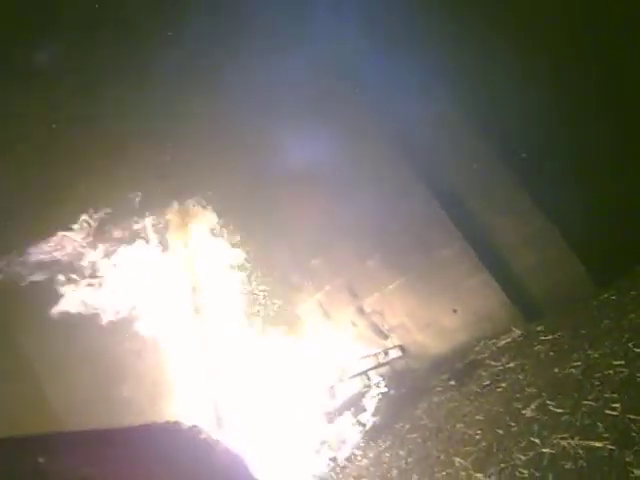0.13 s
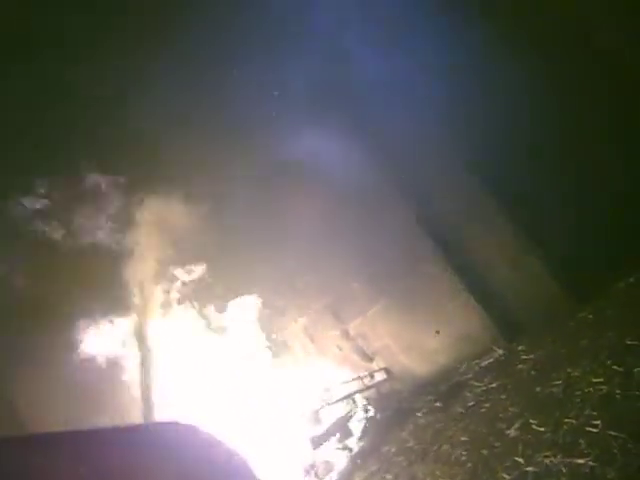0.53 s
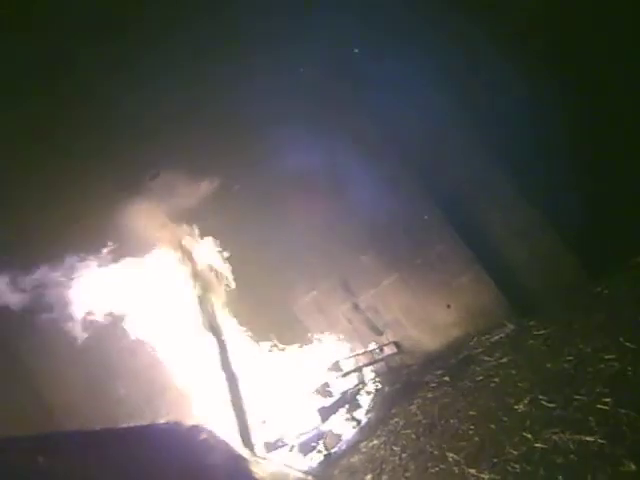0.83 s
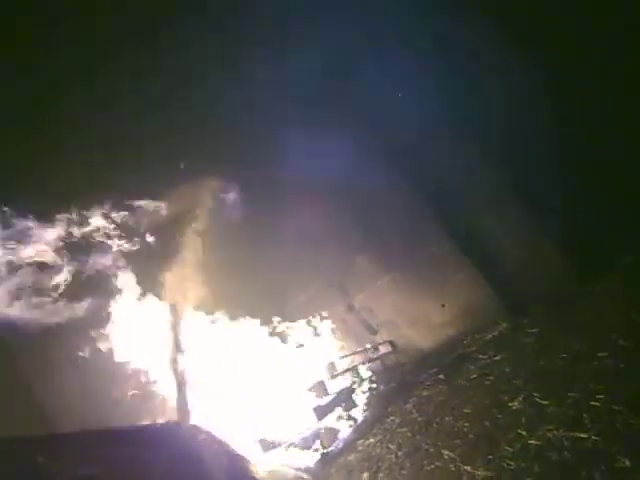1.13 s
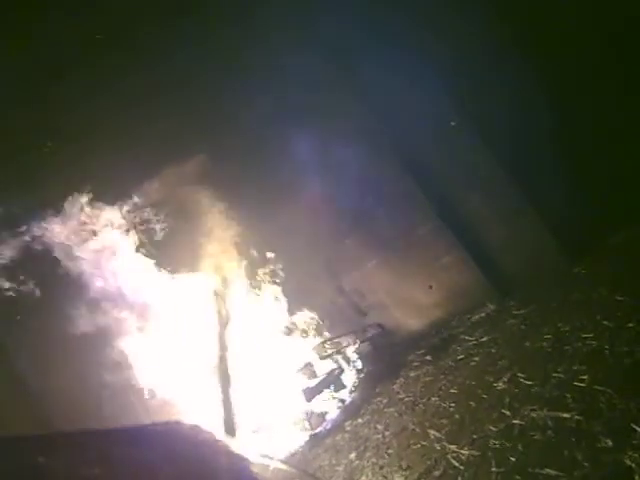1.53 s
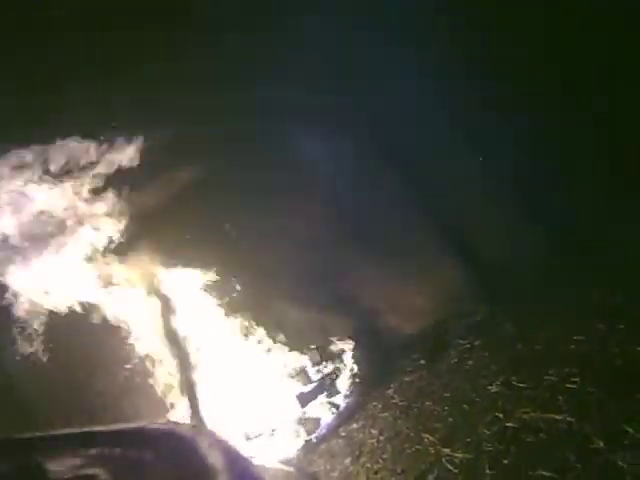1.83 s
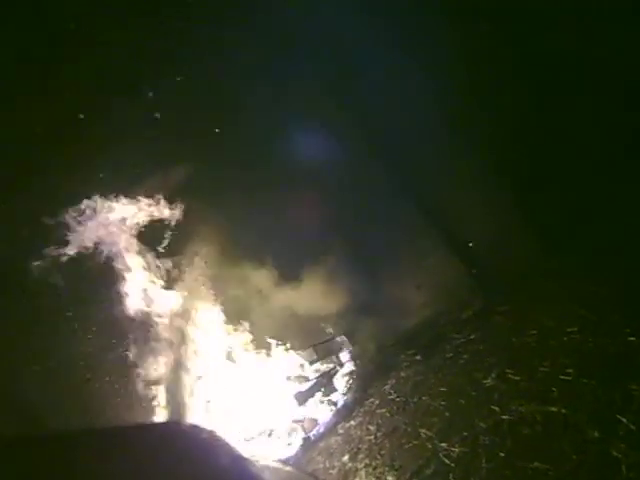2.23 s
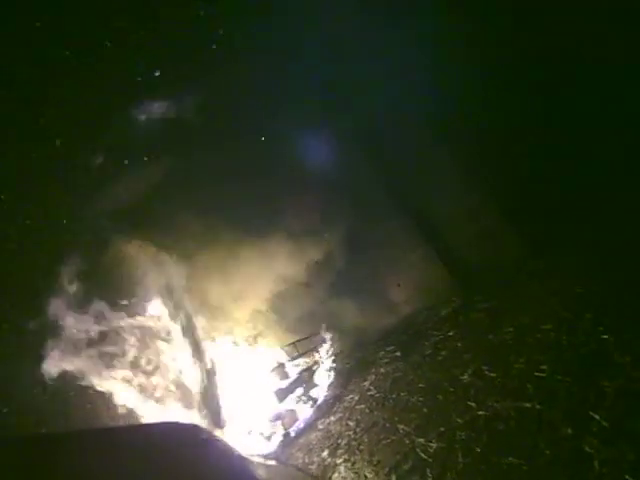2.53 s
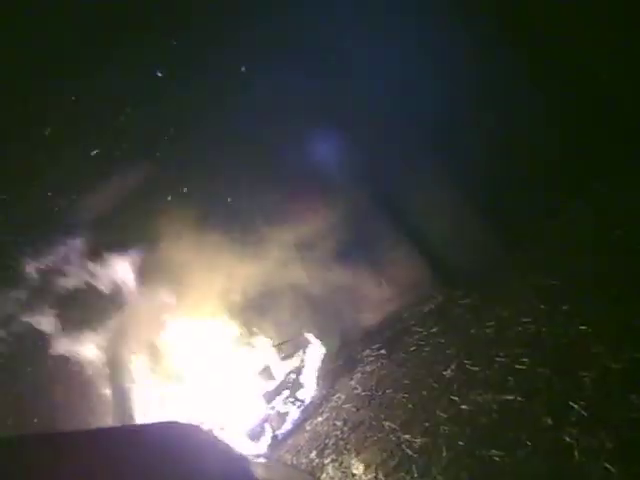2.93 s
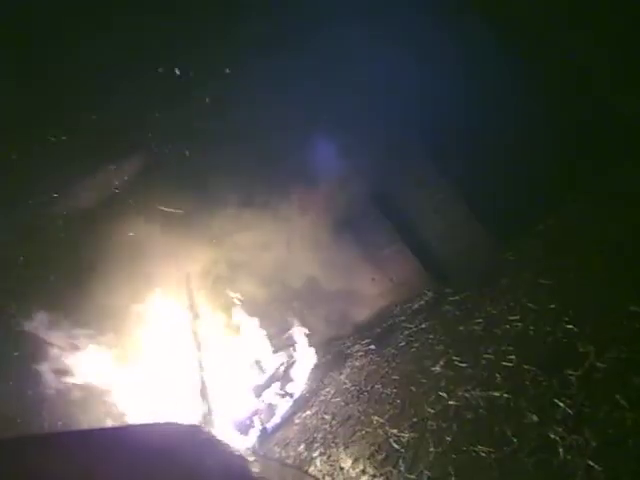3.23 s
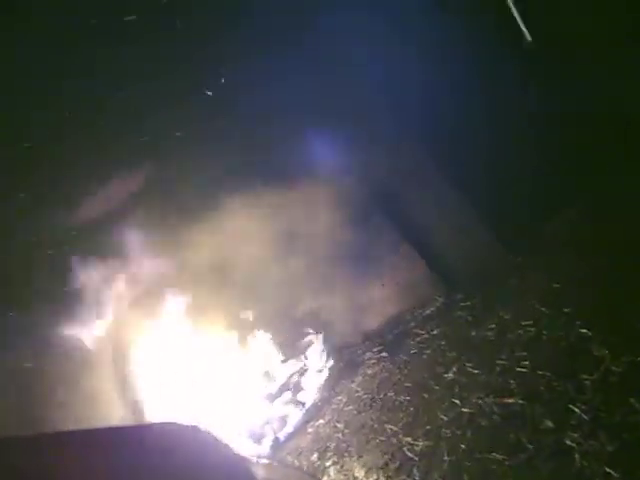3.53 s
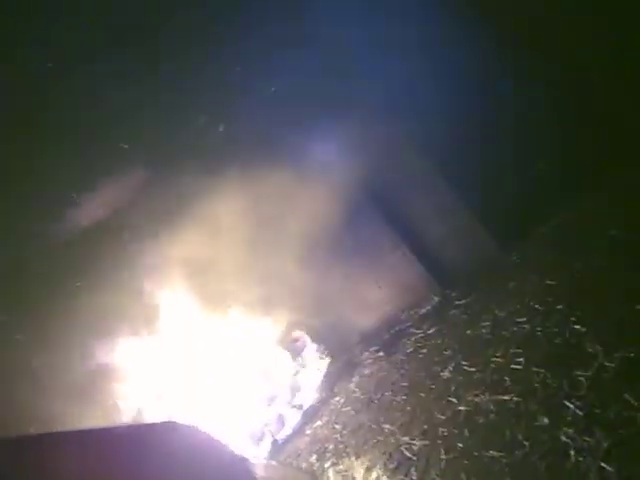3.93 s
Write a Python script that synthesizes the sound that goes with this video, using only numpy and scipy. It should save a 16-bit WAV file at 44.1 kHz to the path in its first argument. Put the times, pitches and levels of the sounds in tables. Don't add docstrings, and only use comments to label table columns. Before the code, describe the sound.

In a bare concrete room, a water jet gives a quick spit, thins for about a third of a second, then opens into full harsh spray. It surges over burning pallets, slapping, drumming and fizzing to steam, with board knocks and sharp straw cracks over a low fire roar. A close camera in a closed housing makes it boxy and resonant, with a dull rapid electrical tick underneath.

```python
import sys
import numpy as np
from scipy import signal
from scipy.fft import rfft, irfft
from scipy.io import wavfile
from scipy.ndimage import uniform_filter1d

SR = 44100
rng = np.random.default_rng(int(sys.argv[2]) if len(sys.argv) > 2 else 0)


def rack_gain(trim_db):
    fader = np.asarray(trim_db, float)
    return 10 ** (fader / 20)


def unload_wav(signal):
    wavfile.write(
        sys.argv[1],
        SR,
        np.round(np.clip(np.atleast_2d(signal).T, -1, 1) * 32767).astype(np.int16),
    )


N = 179531

# (frequency [Hz], level [dB])
WALL_WASH = [(120, -29), (200, -40), (269, -8.5), (382, -6.5), (417, -6), (477, -10.5), (603, -5),
             (886, -8), (1000, -0.5), (1300, -43), (2200, -120)]
# (peak time [s], swell [dB], half length [s])
STEAM_FLASHES = [(0.62, 3.5, 0.14), (0.815, 13, 0.1), (1.19, 8, 0.035), (1.375, 5, 0.065), (1.54, 8, 0.19),
                 (1.834, 6.5, 0.093), (2.073, 6, 0.11), (2.288, 10, 0.11), (2.512, 10.5, 0.09),
                 (2.75, 7, .1), (3.118, 14, 0.064), (3.663, 9, 0.12), (4.07, 10, 0.081)]
# (frequency [Hz], width [Hz], level [dB])
HOUSING_MODES = [(1026, 81, -13), (1235, 148, -8.5), (1340, 59, -17.5), (1724, 163, -3.5), (1899, 83, 0.5),
                 (1998, 154, -3), (2670, 130, -10.5), (2843, 154, -13), (3170, 130, -11), (3348, 168, -4),
                 (3856, 330, -9.5), (4082, 324, -6), (4826, 355, -10.5), (5510, 770, -14.5),
                 (6730, 980, -15.5), (8580, 690, -12.5), (10400, 1820, -10), (12000, 990, -13),
                 (14100, 650, -60)]
TOP_MODE = (14950, 800, -21)
# (time [s], peak level [dB], centre frequency [Hz])
STRAW_CRACKS = [
    (.26, -27, 5000),
    (0.339, -19, 12000),
    (.712, -11, 13500),
    (.872, -12, 8000),
    (1.106, -9, 7100),
    (1.378, -18, 11500),
    (1.965, -13, 6000),
    (3.415, -15, 7500),
    (3.694, -3.5, 6440),
    (3.961, -11, 9000),
]
# (time [s], peak level [dB], pitch [Hz], 60 dB decay time [s])
BOARD_KNOCKS = [(0.557, -9.5, 355, 0.041), (0.78, -18, 350, 0.068), (0.893, -17, 334, 0.036),
                (1.558, -22, 219, 0.091), (1.612, -29, 215, 0.08), (1.774, -27, 234, 0.19),
                (2.187, -17.5, 291, 0.05), (3.075, -12.5, 185, 0.1), (3.08, -16, 1250, 0.15),
                (3.2, -15, 1216, 0.1), (3.612, -14, 1235, 0.13), (3.175, -21, 176.1, 0.091),
                (3.608, -23, 202, 0.072), (.56, -19.5, 159, 0.084), (.895, -16.5, 576, 0.049),
                (0.429, -51, 78.1, 0.1), (0.739, -25, 51.1, 0.1123), (0.919, -23, 53.8, 0.081),
                (1.734, -18, 88.8, 0.04), (2.489, -29, 48.4, 0.11), (3.074, -18, 70.0, 0.1),
                (3.509, -19.5, 44.6, 0.1242), (3.619, -24, 54.3, 0.1277)]
# (time [s], flow [dB], fineness of the spray [dB])
NOZZLE_FLOW = [(0.0, -1.5, -3.5), (0.061, -11.5, 3), (0.082, -6.5, 5.5), (0.13, -13.5, 0), (0.19, -18, 0),
               (0.277, -15, 0), (0.364, -13.5, 4), (0.368, -5.5, -0.5), (0.5, -3, -2), (0.58, 2, -0.5),
               (1.05, 2, -1.5), (1.3, 1.5, -2), (1.87, 0, 1), (2.25, 0.5, -0.5), (2.8, -1, 2.5),
               (3.38, -2.5, 0.5), (3.5, 0.5, 1.5), (4.07, -2, 1.5)]
# (start [s], rise [s], fall length [s], strength [dB], hollowness [dB])
JET_PASSES = [(0.726, 0.11, 0.098, 3.5, 6.5), (1.097, .004, 0.064, 4, -5), (1.13, 0.041, 0.087, 4.5, -0.5),
              (1.38, 0.065, 0.15, 4, 5.5), (1.685, .004, 0.14, 6, -1.5), (1.918, 0.033, 0.13, 4, 3.5),
              (2.173, 0.052, .06, -4, 8.5), (2.445, 0.054, .18, 6.5, 6), (2.834, 0.046, 0.14, 2.5, -4.5),
              (3.065, 0.011, 0.19, 8.5, 8.5), (3.592, 0.033, 0.27, 9, 4), (4.0, .06, 0.071, -0.5, 6),
              (0.52, 0.044, 0.23, 1, 3)]
# (time [s], rise of splash [dB], rise of fizz [dB], length [s])
EDGE_SPURTS = [(0.0645, 10, 12, 0.013), (0.09, 5, 0, .01), (0.432, 7, -6, 0.0057), (0.521, 4.5, 11.5, .008),
               (0.579, 5.5, 9, 0.007), (0.596, 3, 6, 0.0047), (0.746, 2.5, 3, 0.0053),
               (0.859, 4, 2.5, 0.009), (1.177, 2, -2, 0.017), (1.222, 2, -3, 0.0053), (1.372, -3, 6, 0.015),
               (1.96, 4, 2.5, 0.016), (2.537, 5, 12, 0.02), (3.138, -1, 1, 0.0063), (3.17, 5.5, 1, 0.01),
               (3.207, 2, 2, 0.019), (3.252, 1, 2.5, 0.0088), (3.459, 2, 10.5, 0.022), (3.501, 6, 7, 0.015),
               (3.708, -2, 2, 0.01), (3.731, 1, -3, 0.011), (3.75, 1, -1, 0.0059), (0.262, 0, 3.5, 0.026),
               (.335, 0, 1, .01), (0.658, 2.5, 2, 0.011), (1.394, 1.5, 3.5, 0.043), (1.705, 2.5, -1, 0.016),
               (2.852, 3, 0.5, 0.066)]
# (rest level [dB], share of flow [dB/dB], of fineness [dB/dB], of strength [dB/dB], of hollowness [dB/dB])
BOOM = (-45.5, 0.2, -0.8, 0.34, -0.3)
LOWER_WASH = (-44.5, 0.76, 0.1, 0.68, 0.54)
UPPER_WASH = (-41, 0.84, -0.5, 0.82, 0.83)
FIZZ = (-23.5, 0.78, 1, 0.49, 0.05)
SLAP = (-32, 1.0, -0.36, 0.92, 0.32)
DRUM = (-24, 1.0, -0.5, 1.0, 0.08)
SPLASH = (-22, 1.08, 0.53, 0.65, 0.11)


def evened(x):
    return x / np.sqrt(np.mean(x ** 2) + 1e-20)


def add(mix, start_s, sound):
    part = mix[max(round(start_s * SR), 0):][:len(sound)]
    part += sound[:len(part)]


def band(x, lo_hz, hi_hz, order=2):
    edges_hz = [lo_hz, min(hi_hz, 0.49 * SR)]
    return signal.sosfilt(signal.butter(order, edges_hz, "bandpass", fs=SR, output="sos"), x)


def churn(patchy_db, flicker_db, size=256):
    frames, bins = 4 * N // size + 5, size // 2 + 1
    real, imaginary, patches = rng.standard_normal((frames, bins, 3)).T
    patches = uniform_filter1d(patches, size=5, axis=0)
    patches = evened(uniform_filter1d(patches, size=30, axis=1))
    flicker = evened(uniform_filter1d(rng.standard_normal(frames), size=12))
    spectrum = (real + 1j * imaginary) * rack_gain(patchy_db * patches + flicker_db * flicker)
    noise = signal.istft(spectrum, nperseg=size, noverlap=3 * size // 4)[1]
    return evened(noise[:N])


def drops(per_s, spread_db, fade_s):
    size_db = spread_db * np.minimum(rng.exponential(1, N), 5)
    hits = rack_gain(size_db) * (rng.random(N) < per_s / SR)
    puffs = signal.lfilter([1], [1, -np.exp(-1 / (fade_s * SR))], hits)
    return evened(puffs * rng.standard_normal(N))


def housing(x):
    hz = abs(np.fft.fftfreq(4096, 1 / SR))
    power = rack_gain(2 * -23.5) / (1 + (hz / 7000) ** 4)
    for mode_hz, width_hz, db in HOUSING_MODES + [TOP_MODE]:
        offset = 2 * (hz - mode_hz) / (1.54 * width_hz)
        power = power + rack_gain(2 * db) / (1 + offset ** 2) ** 2
    log_gain = 0.5 * np.log(power)
    taps = np.fft.ifft(np.exp(np.conj(signal.hilbert(log_gain)))).real[:2048]
    return signal.oaconvolve(x, taps)[:N]


def follow(layer, lag_s=0.0):
    t = np.arange(N) / SR
    flow_s, flow_db, fineness_db = np.array(NOZZLE_FLOW).T
    strength, hollowness = np.zeros(N), np.zeros(N)
    for start_s, rise_s, length_s, strength_db, hollow_db in JET_PASSES:
        top_s = rise_s + lag_s
        rise = np.clip((t - start_s) / top_s, 0, 1)
        fall = np.exp(-(np.maximum(t - start_s - top_s, 0) / length_s) ** 2)
        strength += strength_db * rise * fall
        hollowness += hollow_db * rise * fall
    flow, fineness = np.interp(t, flow_s, flow_db), np.interp(t, flow_s, fineness_db)
    return rack_gain(np.dot(layer, [np.ones(N), flow, fineness, strength, hollowness]))


def flashes():
    t = np.arange(N) / SR
    return rack_gain(sum(db * np.exp(-((t - peak_s) / half_s) ** 2) for peak_s, db, half_s in STEAM_FLASHES))


def room():
    wash_hz, wash_db = np.transpose(WALL_WASH)
    noise = rfft(churn(patchy_db=0.3, flicker_db=0.6, size=1024))
    hz = np.fft.rfftfreq(N, 1 / SR)
    wash = irfft(noise * rack_gain(np.interp(np.log(hz + 1), np.log(wash_hz), wash_db)), N)
    upper = evened(band(wash, 470, 950, order=3)) * follow(UPPER_WASH)
    lower = evened(band(wash, 250, 470, order=3)) * follow(LOWER_WASH, lag_s=0.031)
    boom = evened(band(rng.standard_normal(N), 164, 237)) * follow(BOOM) * flashes()
    roar = evened(band(rng.standard_normal(N), 28, 112)) * rack_gain(-40)
    stirred_roar = roar * (follow(DRUM) / rack_gain(-20.5)) ** 0.9
    return upper + lower + boom + stirred_roar


def frame_ticks():
    frame_hz, first_frame_s = 30.005, -0.0003
    cycles = (np.arange(N) / SR - first_frame_s) * frame_hz + 0.5
    frame = cycles.astype(int)
    depth, lag = rng.random((int(cycles[-1]) + 1, 2)).T
    t = (cycles % 1 - 0.5) / frame_hz - 0.0032 * (lag[frame] - 0.5)
    width_s = np.where(t < 0, 0.0017, 0.0028)
    dip = np.exp(-(t / width_s) ** 2) * (0.38 + 1.06 * depth[frame])
    return -rack_gain(-24.5) * band(dip, 1.7, 900, order=1)


def cracks():
    out, t = np.zeros(N), np.arange(round(0.01723 * SR)) / SR
    for start_s, db, hz in STRAW_CRACKS:
        snap = evened(band(rng.standard_normal(len(t)), 0.72 * hz, 1.3 * hz))
        add(out, start_s, rack_gain(db - 5) * snap * np.exp(-(t / 0.003) ** 2))
    return out


def knocks():
    out, t = np.zeros(N), np.arange(round(0.2 * SR)) / SR
    for start_s, db, hz, t60_s in BOARD_KNOCKS:
        thud = evened(band(rng.standard_normal(len(t)), 0.27 * hz, 0.99 * hz))
        ring = np.sin(2 * np.pi * hz * t)
        onset = 1 - np.exp(-t / 0.0038)
        add(out, start_s, rack_gain(db - 60 * t / t60_s) * onset * (ring + 0.12 * thud))
    return out


def spurts(column):
    rise_db, t = np.zeros(N), np.arange(round(0.06 * SR)) / SR
    for row in EDGE_SPURTS:
        start_s, length_s = row[0], row[3]
        shape = (1 - np.exp(-t / 0.00072)) * np.exp(-(t / length_s) ** 3)
        add(rise_db, start_s, row[column] * shape)
    return rack_gain(rise_db)


def fizz():
    mist = churn(patchy_db=0.63, flicker_db=0.0) + 0.55 * drops(per_s=450, spread_db=0.0, fade_s=0.0044)
    hiss = evened(housing(band(mist, 6020, 15700, order=4)))
    return hiss * follow(FIZZ, lag_s=0.01) * spurts(column=2)


def splash():
    jet = churn(patchy_db=1.0, flicker_db=-1.1)
    water = housing(jet + 0.33 * drops(per_s=260, spread_db=4.0, fade_s=0.0029))
    slapping = evened(band(water, 930, 1490, order=4)) * follow(SLAP)
    drumming = evened(band(water, 1490, 2400, order=4)) * follow(DRUM)
    breaking = evened(band(water, 2400, 5800, order=4)) * follow(SPLASH)
    return (slapping + drumming + breaking) * spurts(column=1)


def scene():
    return (room() + cracks() + knocks() + fizz() + splash())[None]


def band_limit(x):
    return signal.sosfilt(signal.butter(12, 16720, fs=SR, output="sos"), x)


def record(dry):
    limit = 0.84
    line = limit * np.tanh((dry + frame_ticks()) / limit)
    treble_edge = signal.firwin(2047, 15740, window=("kaiser", 12), fs=SR)
    mix = signal.oaconvolve(line, treble_edge[None], "same")
    return band_limit(mix)


dry = scene()
out = record(dry)
unload_wav(out)
```